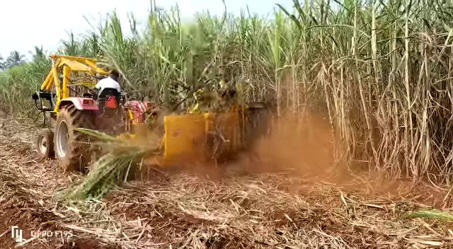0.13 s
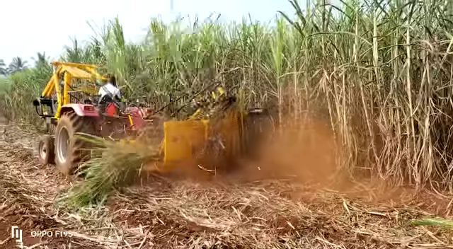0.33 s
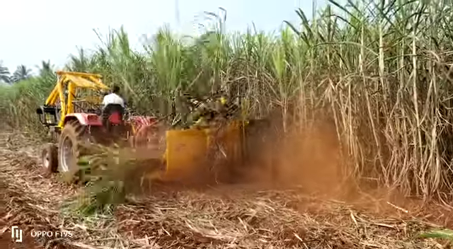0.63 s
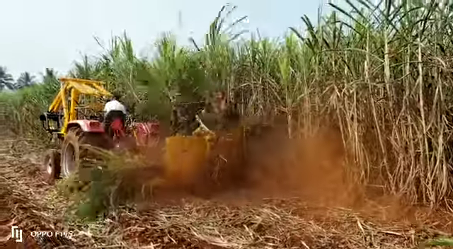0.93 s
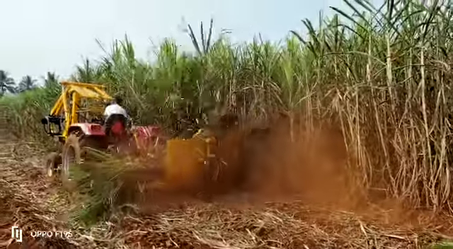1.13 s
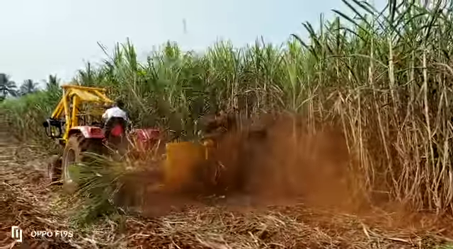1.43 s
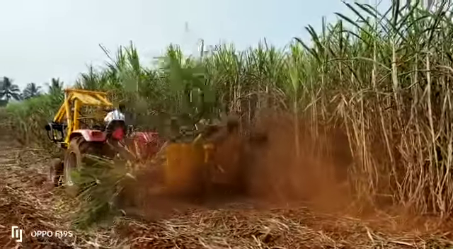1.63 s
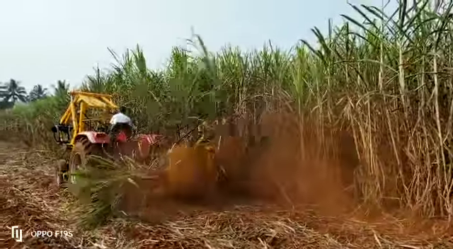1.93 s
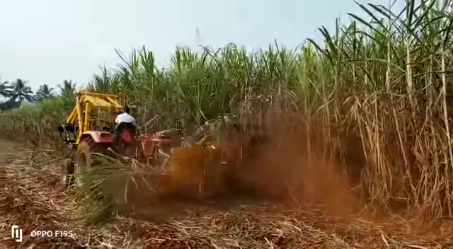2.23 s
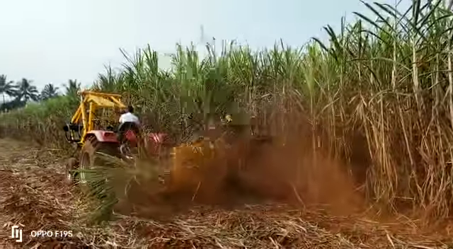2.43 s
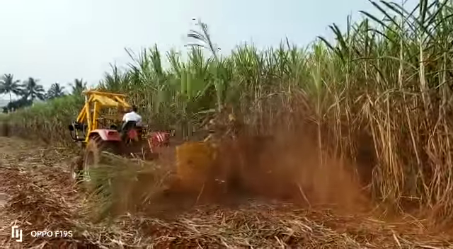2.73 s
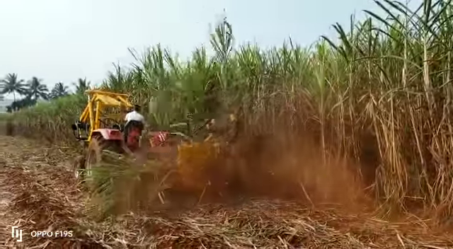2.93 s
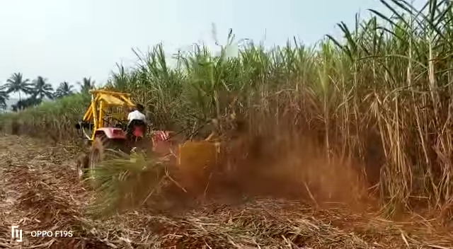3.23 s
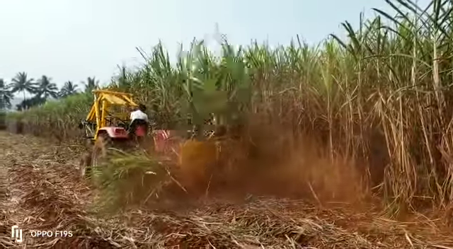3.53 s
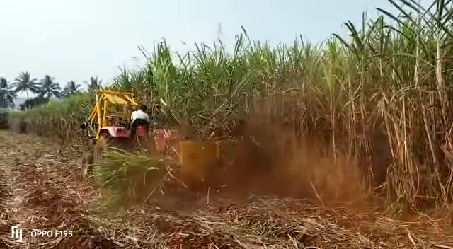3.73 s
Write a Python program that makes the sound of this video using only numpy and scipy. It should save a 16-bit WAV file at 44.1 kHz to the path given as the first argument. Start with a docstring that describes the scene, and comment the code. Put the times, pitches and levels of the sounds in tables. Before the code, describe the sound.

A cane cutter pulled by a tractor roars with throbbing gear whine, thrashing leaves and snapping stalks; loud at first, then suddenly weaker, with more snaps near the end; outdoors in a field, mono microphone.

```python
"""Leaves thrash and stalks snap at the blades of a cane cutter drawn through a field by a tractor.
Filtered noise with tiny cracks and pitched splinters makes the leaves; decaying noise bursts make the snaps.
Decaying partials make one knock on the steel housing, and drifting sines the throbbing gear whine.
Coloured noise makes the machine's roar, over engine and shaft hum, faint high machine tones and a low rumble.
After a short silence the sounds enter and swell quickly; leaves, roar and whine are mostly weaker after 1.6 s."""
import sys
import numpy as np
from scipy import signal
from scipy.io import wavfile
from scipy.ndimage import uniform_filter1d

SR = 44100
rng = np.random.default_rng(int(sys.argv[2]) if len(sys.argv) > 2 else 0)


def to_wav(s):
    """Save 16-bit WAV."""
    ch = np.atleast_2d(s).T  # columns
    pcm = np.round(np.clip(ch, -1, 1) * 32767)  # PCM
    wavfile.write(sys.argv[1], SR, pcm.astype(np.int16))


N = 170667

# Spectral densities are relative: each coloured noise is normalised before its level is set.
# Engine and shaft tones [pitch_hz, rms_level_db]
HUM_TONES = [(44.5, -57.5), (64.7, -56), (89.4, -42), (130.3, -44), (178, -44)]
# Spectral density of the steady rumble under the hum [frequency_hz, density_db_per_hz]
RUMBLE_SPECTRUM = [(20, -49), (40, -27), (70, -1), (110, 9), (160, 13), (250, -29)]
# Faint high machine tones [pitch_hz, peak_level_db]
HIGH_TONES = [(1805, -43), (2760, -43), (3530, -45)]
# Spectral density of the roar [frequency_hz, density_db_per_hz]
ROAR_SPECTRUM = [(82, -24), (140, -11), (200, 1.5), (238, -2.5), (272, 0), (310, -7), (385, -10),
                 (435, -7.5), (503, -12.5), (563, -12), (672, -7), (845, -2.5), (900, -3), (1030, -14),
                 (1230, -8.5), (1390, -8), (1570, -13), (1800, -12.5), (1950, -19), (2600, -41),
                 (4400, -100)]
# Level of the roar through time [time_s, level_db]
ROAR_LEVELS = [(0.13, -33.5), (0.21, -24.5), (0.34, -20.5), (0.38, -17), (0.46, -20), (0.67, -23),
               (0.71, -20), (0.73, -23), (1.59, -20.5), (1.63, -29), (2.0, -28), (2.11, -29), (3.07, -29.5),
               (3.16, -27.5), (3.17, -31), (3.66, -29), (3.87, -30.5)]
# Gear mesh, its level giving the throb about the mean [time_s, pitch_hz, level_db]
GEAR_MESH = [(0.13, 920.5, -36), (0.146, 924, -26), (0.364, 915, -16.5), (0.376, 916, -29),
             (0.444, 918, -20), (0.666, 924, -19), (0.678, 918.1, -28), (0.714, 917, -17), (0.78, 927, -33),
             (0.812, 909, -18), (0.888, 924.6, -19.5), (0.948, 930.1, -28), (1.03, 921, -22.5),
             (1.054, 919.1, -40), (1.07, 919.8, -22), (1.24, 916, -23.5), (1.272, 919.5, -13.5),
             (1.324, 898, -47), (1.344, 901, -25), (1.394, 911.1, -23), (1.462, 902.4, -32),
             (1.526, 906, -36), (1.565, 916, -19), (1.58, 922, -36), (1.6, 930, -27), (1.64, 912, -23),
             (1.66, 904, -32), (1.73, 934, -25), (1.79, 926, -32), (1.83, 915, -24), (1.86, 925, -34),
             (1.91, 911, -26), (2.01, 910.5, -49), (2.09, 924, -28.5), (2.16, 905, -40), (2.21, 917, -29.5),
             (2.28, 927, -29), (2.35, 907, -37), (2.38, 904.5, -30.5), (2.44, 915.6, -40),
             (2.46, 916.1, -30), (2.51, 926, -46), (2.56, 922, -31), (2.58, 910, -41), (2.61, 920, -32),
             (2.69, 908, -42), (2.74, 919, -28), (2.79, 924, -32.5), (2.81, 929, -44), (2.84, 924, -37),
             (2.88, 907, -39), (2.9, 903, -36), (2.96, 920, -30.5), (2.99, 903, -52), (3.01, 899.1, -27.5),
             (3.04, 898, -51), (3.11, 915, -27), (3.15, 896, -45), (3.21, 891.4, -30), (3.22, 901, -44),
             (3.29, 912.4, -28.5), (3.35, 917.9, -38), (3.39, 894, -38), (3.44, 922, -46), (3.48, 912, -23),
             (3.54, 910, -38), (3.58, 915, -23.5), (3.64, 927, -34), (3.67, 917, -24), (3.7, 918, -37),
             (3.75, 918, -26), (3.87, 938, -34.5)]
# Multiples of the mesh pitch [multiple, level_db, share_of_throb, random_waver_db]
MESH_ORDERS = [(.5, -17, 0.18, 4), (1, -1, 0.94, -0.5)]
# Strokes on the housing [start_s, level_db]
KNOCK_EVENTS = [(0.369, -3.5)]
# Modes of the sheet-steel housing, levels relative [pitch_hz, level_db, t60_s]
HOUSING_MODES = [(199.5, 1, 0.38), (351.5, 1, 0.53), (388, -5.5, 0.37), (436, -2, 0.16), (640, -4, 0.19),
                 (765, 5.5, 0.23), (830, 3, 0.22), (1330, -10, 0.17)]
# Stalks cut; level before the crest offset [start_s, level_db, pitch_hz, t60_s, hiss_to_ring_db]
SNAP_EVENTS = [(0.156, -12, 3170, 0.047, 7), (0.241, -11, 3570, 0.12, 3), (0.2644, -9, 3920, 0.11, -3),
               (0.4511, -5, 4040, 0.067, -10), (0.517, -6, 3000, 0.027, -2), (0.5411, -4.5, 2880, 0.073, 6),
               (0.606, -2, 3720, 0.059, -4), (0.6178, -8, 3503, 0.029, -5), (0.6845, -12, 2420, 0.058, 15),
               (0.7147, -7, 2700, 0.066, 19), (0.7781, -12.5, 2510, 0.13, 8),
               (0.8962, -11.5, 2755, 0.14, -1), (1.0455, -4, 2800, 0.036, -5),
               (1.1219, -6.5, 2578, 0.086, 13), (1.1895, -10, 2955, 0.081, -14),
               (1.338, -8.5, 2690, 0.075, 10), (1.4293, -5, 2770, 0.1, 10), (1.5128, -12, 2890, 0.081, 10),
               (1.568, -10.5, 2820, 0.08, 15), (1.6125, -8, 2660, 0.061, 23),
               (1.8395, -18, 2747, 0.067, 10), (1.995, -16.5, 2667, 0.13, 22),
               (2.0597, -17, 3600, 0.064, 7), (2.148, -15.5, 2634, 0.082, 9), (2.343, -19, 4290, 0.048, 5),
               (2.44, -19, 4243, 0.063, 5), (2.927, -19, 2696, 0.062, -3), (2.9946, -15.5, 3500, 0.07, -11),
               (3.052, -17, 10000, 0.081, -7), (3.1023, -7, 3024, 0.03, 0), (3.113, -15, 2740, 0.064, 0),
               (3.1627, -3, 2700, 0.042, 8), (3.1888, -16, 3564, 0.083, 4), (3.243, -16.5, 2895, 0.27, 10),
               (3.343, -17, 4256, 0.089, 0), (3.4359, -18, 2560, 0.056, 5), (3.474, -8.5, 2593, 0.06, -5),
               (3.482, -11.5, 3595, 0.073, 5), (3.5733, -10.5, 2607, 0.05, 11), (3.61, -11, 3482, 0.07, -1),
               (3.7623, -12.5, 3626, 0.081, -3), (3.7848, -17, 2572, 0.087, 5),
               (3.8441, -11, 3620, 0.044, 24)]
# Low end of the snap spectrum [frequency_hz, density_db_per_hz]
SNAP_LOW_SPECTRUM = [(800, -33), (1500, -8.5)]
# Spectral density of leaves and stalks through the microphone [frequency_hz, density_db_per_hz]
LEAF_SPECTRUM = [(1120, -33), (1900, -56), (1970, -11), (2220, 0), (2400, -1), (2810, 5), (3120, -4.5),
                 (3440, 2), (3590, 0.5), (4200, -2.5), (4750, -9), (5760, -5), (6390, -7.5), (7100, -3.5),
                 (7950, -11.5), (9550, -27.5), (11000, -22), (11900, -17.5), (15300, -20)]
# Level of the leaves through time [time_s, level_db]
LEAF_LEVELS = [(.13, -31), (.2, -25), (.27, -23), (.4, -20.5), (.5, -24), (.66, -22), (.75, -22.5),
               (.86, -24), (1.0, -22), (1.15, -24), (1.28, -22.5), (1.4, -23.5), (1.53, -21.5), (1.62, -22),
               (1.66, -28.5), (1.9, -30), (2.2, -31), (2.45, -29.5), (2.58, -33.5), (2.75, -29.5),
               (2.95, -29), (3.1, -24), (3.21, -29.5), (3.27, -30.5), (3.4, -29.5), (3.48, -26),
               (3.54, -29.5), (3.64, -26.5), (3.74, -31.5), (3.87, -29)]
# Gain applied to the upper treble of the leaves, before colouring [time_s, gain_db]
LEAF_TREBLE = [(.13, -15), (.7, -9), (1.5, -2), (2.2, -4.5), (2.7, -10.5), (3.87, -0.5)]

# Onset and microphone
START_S, FADE_IN_S, FADE_IN_DB = .1275, 0.091, -18  # the hum's own swell; others rise by their level tables
MIC_LOW_HZ, EDGE_HZ = 30, 15650

# Random drifts: pitch wander is a fraction of the pitch (rms)
HUM_WANDER, HUM_WAVER_DB, RUMBLE_DB = .005, 1.1, -46
HIGH_WANDER, HIGH_WAVER_DB = .008, 5
WHINE_MEAN_DB, WHINE_FUZZ = -28, .0015

# Snaps
SNAP_RISE_S, SNAP_CREST_DB = .0015, -8
SNAP_WIDTH_HZ, SNAP_DULL_HZ = 1200, 9400  # width of the ring's resonance; low-pass of the hiss

# Leaves
UPPER_HZ = 5300
CRACKLE_PER_S, CRACKLE_SPREAD_DB, CRACKLE_DB, CRACKLE_T60_S = 150, 4.5, -12, .035
SPLINTER_HZ, SPLINTERS_PER_S, SPLINTER_DB = (1798, 13080), 1300, -7.5
SPLINTER_CYCLES, SPLINTER_SPREAD_DB = 20, 3  # cycles of ring until the amplitude has fallen to 1/e


def amp(db):
    """Level law: twenty decibels are a factor of ten in amplitude."""
    return 10 ** (np.asarray(db) / 20)


def evened(x):
    """Normalisation to unit mean power."""
    return x / np.sqrt(np.mean(x ** 2) + 1e-20)


def read(points, hz):
    """Interpolation of a spectrum along a logarithmic frequency axis."""
    f, value = np.transpose(points)
    return np.interp(np.log(hz + 1), np.log(f + 1), value)


def curve(table, column, t):
    """Linear interpolation of one table column through time."""
    return np.interp(t, np.transpose(table)[0], np.transpose(table)[column])


def drift(length_s):
    """Slow random modulation: white noise averaged twice over length_s, then set to rms 1."""
    size = max(round(length_s * SR), 1)
    smoothed = uniform_filter1d(rng.standard_normal(N), size)
    return evened(uniform_filter1d(smoothed, size))


def coloured(x, spectrum):
    """Minimum-phase filtering: the log gain alone fixes a causal response, here of unit energy."""
    hz = np.abs(np.fft.fftfreq(8192, 1 / SR))
    points = [(0, -90)] + spectrum + [(SR, spectrum[-1][1])]
    log_gain = np.log(amp(read(points, hz)))
    taps = np.fft.ifft(np.exp(np.conj(signal.hilbert(log_gain)))).real[:4096]
    return signal.oaconvolve(x, taps / np.linalg.norm(taps))[:len(x)]


def patchy(patchy_db, flicker_db):
    """Modulated noise: white bins under time-frequency patches and a flicker shared by all pitches."""
    frames = N // 128 + 5
    a, b, patches = rng.standard_normal((frames, 257, 3)).T
    patches = uniform_filter1d(patches, 6, axis=0)  # across frequency bins
    patches = evened(uniform_filter1d(patches, 16, axis=1))  # across time frames
    flicker = evened(uniform_filter1d(rng.standard_normal(frames), size=8))
    bins = (a + 1j * b) * amp(patchy_db * patches + flicker_db * flicker)
    return evened(signal.istft(bins, nperseg=512, noverlap=384)[1][:N])


def sparse(per_s, spread_db):
    """Random impulses at a mean rate, with exponentially distributed decibels: a few are large."""
    sizes = amp(spread_db * np.minimum(rng.exponential(1, N), 4))
    return sizes * (rng.random(N) < per_s / SR)


def hum():
    """Rotating machinery radiates discrete low tones, slightly unsteady, over a steady noise rumble."""
    out = np.zeros(N)
    for hz, db in HUM_TONES:
        level = np.sqrt(2) * amp(db + HUM_WAVER_DB * drift(0.24))
        cycles = np.cumsum(hz * (1 + HUM_WANDER * drift(0.29))) / SR + rng.random()
        out += level * np.sin(2 * np.pi * cycles)
    return out + amp(RUMBLE_DB) * evened(coloured(rng.standard_normal(N), RUMBLE_SPECTRUM))


def high_tones():
    """Frequency and amplitude modulation: faint high machine tones drift and come and go."""
    out = np.zeros(N)
    for hz, db in HIGH_TONES:
        level = amp(db + HIGH_WAVER_DB * drift(0.032))
        cycles = np.cumsum(hz * (1 + HIGH_WANDER * drift(0.0796))) / SR
        out += level * np.sin(2 * np.pi * cycles)
    return out


def roar(t):
    """Broadband radiation: exhaust and machine noise takes a fixed spectrum and swells in patches."""
    noise = patchy(patchy_db=1.2, flicker_db=.6)
    return amp(curve(ROAR_LEVELS, 1, t)) * evened(coloured(noise, ROAR_SPECTRUM))


def whine(t):
    """Gear-mesh tones: meshing teeth sing at related pitches and throb as the cutter shaft turns."""
    mesh_cycles = np.cumsum(curve(GEAR_MESH, 1, t) * (1 + WHINE_FUZZ * drift(0.011))) / SR
    throb_db = curve(GEAR_MESH, 2, t) - WHINE_MEAN_DB
    out = np.zeros(N)
    for multiple, db, share, waver_db in MESH_ORDERS:
        level_db = WHINE_MEAN_DB + db + share * throb_db + waver_db * drift(0.039)
        out += np.sqrt(2) * amp(level_db) * np.sin(2 * np.pi * multiple * mesh_cycles)
    return out


def knocks():
    """Modal ringing: a stalk bundle strikes the sheet-steel housing and excites its damped modes."""
    t, out = np.arange(SR // 2) / SR, np.zeros(N + SR)
    ring = sum(amp(db - 60 * t / t60) * np.sin(2 * np.pi * hz * t) for hz, db, t60 in HOUSING_MODES)
    rise = np.minimum(t / .004, 1)
    for start_s, db in KNOCK_EVENTS:
        out[round(start_s * SR):][:len(t)] += amp(db) * rise * ring / abs(ring).max()
    return out[:N]


def snaps():
    """Impulsive fracture: each cut stalk gives a fast, decaying burst, partly ringing at its own pitch."""
    out, t = np.zeros(N + 8000), np.arange(8000) / SR
    noises = rng.standard_normal((len(SNAP_EVENTS), 8000))
    spectrum = SNAP_LOW_SPECTRUM + LEAF_SPECTRUM[2:]
    for (start_s, db, hz, t60, hiss_db), noise in zip(SNAP_EVENTS, noises):
        ring = signal.lfilter(*signal.iirpeak(hz, hz / SNAP_WIDTH_HZ, SR), noise)
        hiss = signal.lfilter(*signal.butter(2, SNAP_DULL_HZ, fs=SR), noise)
        mixture = amp(hiss_db) * hiss + ring * np.sqrt(SR / SNAP_WIDTH_HZ / 10)
        burst = evened(coloured(mixture, spectrum))
        rise = np.minimum(t / SNAP_RISE_S, 1)
        decay = amp(db + SNAP_CREST_DB - 60 * t / max(t60, .01))
        out[round(start_s * SR):][:8000] += rise * decay * burst
    return out[:N]


def crackle(t):
    """Energy summation: the powers of random small cracks add and decay, giving an envelope."""
    impulses = sparse(CRACKLE_PER_S, CRACKLE_SPREAD_DB) ** 2
    decay = amp(-120 * t[:4000] / CRACKLE_T60_S)  # power, so twice the decibels
    power = signal.oaconvolve(impulses, decay)[:N]
    return np.sqrt(abs(power) / power.mean())


def splinters(t):
    """Damped resonance: random clicks ring at one of forty pitches, the higher ones briefer."""
    clicks = sparse(SPLINTERS_PER_S, SPLINTER_SPREAD_DB)
    kind = rng.integers(0, 40, N)
    pitches = np.geomspace(*SPLINTER_HZ, 40)
    ring_t = t[:2000]
    out = np.zeros(N)
    for k, hz in enumerate(pitches):
        decay = np.exp(-ring_t * hz / SPLINTER_CYCLES)
        ring = hz / pitches[0] * decay * np.sin(2 * np.pi * hz * ring_t)
        out += signal.oaconvolve(clicks * (kind == k), ring)[:N]
    return evened(out)


def thrash(t):
    """Superposed friction and fracture: a leaf hiss flares at small cracks among pitched splinters."""
    hiss = patchy(patchy_db=1.3, flicker_db=.8)
    flaring = evened(hiss * (1 + amp(CRACKLE_DB) * crackle(t)))
    leaves = flaring + amp(SPLINTER_DB) * splinters(t)
    upper = signal.sosfilt(signal.butter(1, UPPER_HZ, "high", fs=SR, output="sos"), leaves)
    leaves = leaves + (amp(curve(LEAF_TREBLE, 1, t)) - 1) * upper
    return amp(curve(LEAF_LEVELS, 1, t)) * evened(coloured(leaves, LEAF_SPECTRUM))


def scene():
    """Linear superposition of all sources, the hum given its own short swell."""
    t = np.arange(N) / SR
    swell = amp(FADE_IN_DB * np.clip(1 - (t - START_S) / FADE_IN_S, 0, 1))
    machine = swell * hum() + high_tones() + roar(t) + whine(t)
    return (machine + knocks() + snaps() + thrash(t))[None]


def record(dry):
    """Band limitation: the microphone loses deep bass, sound opens after silence, a low-pass ends the treble."""
    thin = signal.sosfilt(signal.butter(4, MIC_LOW_HZ, "high", fs=SR, output="sos"), dry)
    opening = np.clip((np.arange(N) / SR - START_S) / 0.00077, 0, 1)
    low_pass = signal.firwin(1023, EDGE_HZ, window=("kaiser", 10), fs=SR)
    return signal.oaconvolve(thin * opening, low_pass[None], "same")


dry = scene()
out = record(dry)
to_wav(out)
```